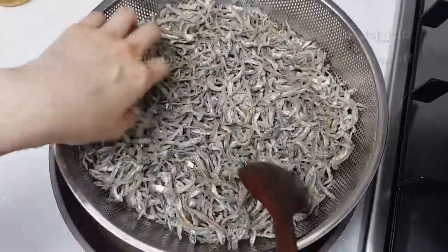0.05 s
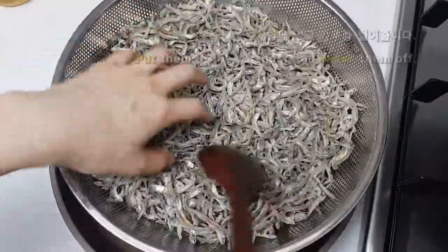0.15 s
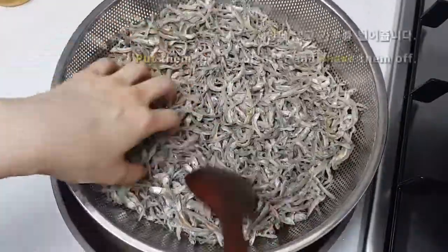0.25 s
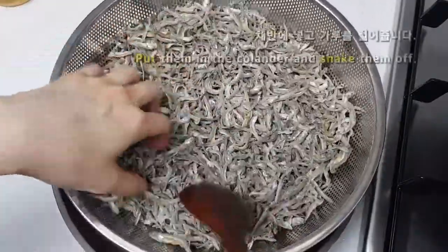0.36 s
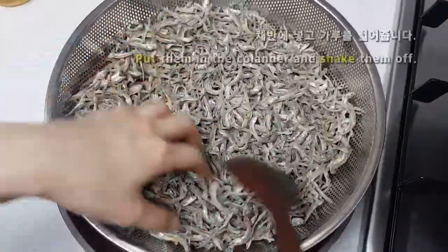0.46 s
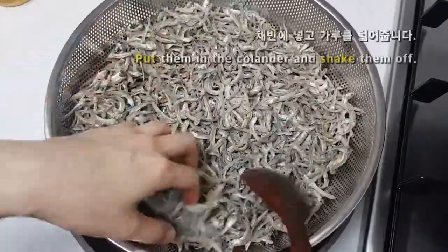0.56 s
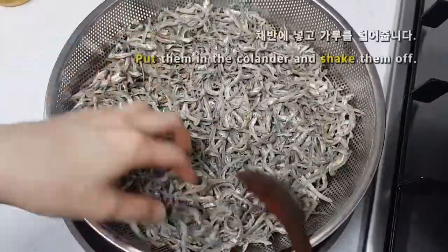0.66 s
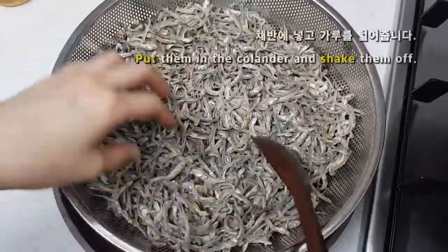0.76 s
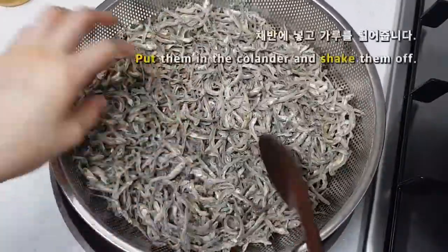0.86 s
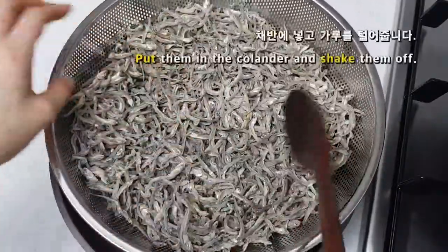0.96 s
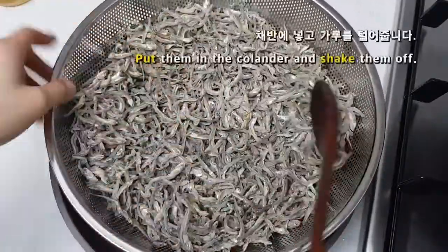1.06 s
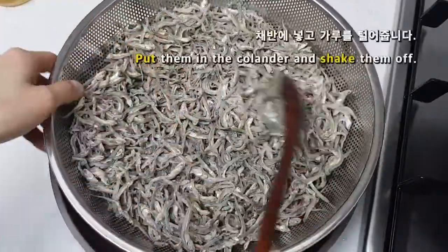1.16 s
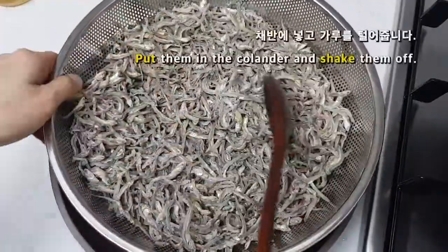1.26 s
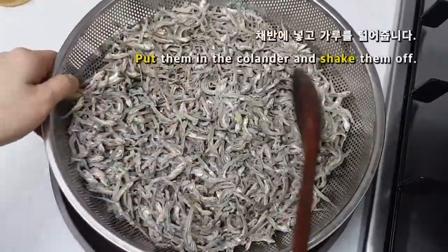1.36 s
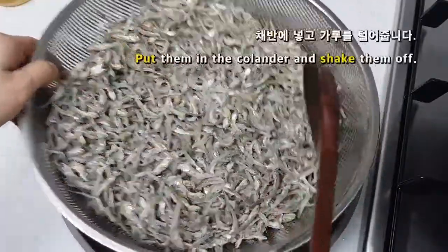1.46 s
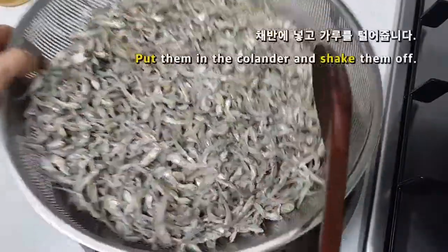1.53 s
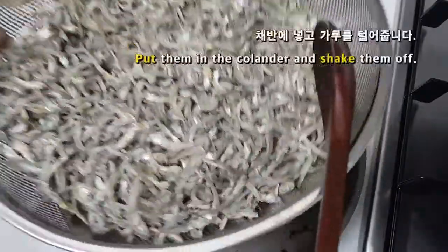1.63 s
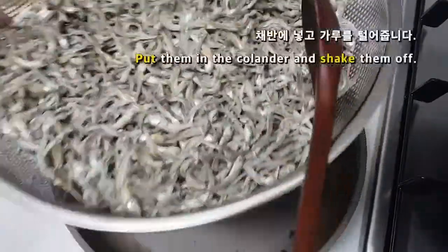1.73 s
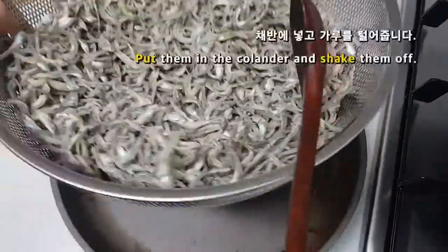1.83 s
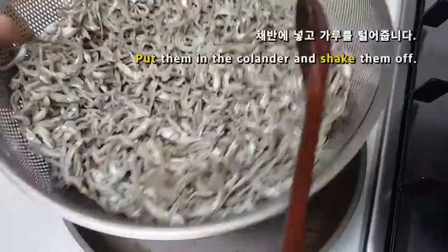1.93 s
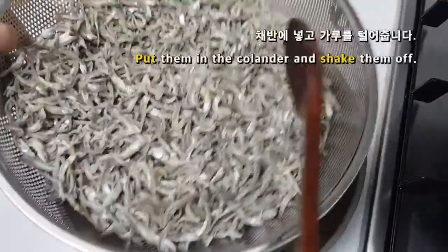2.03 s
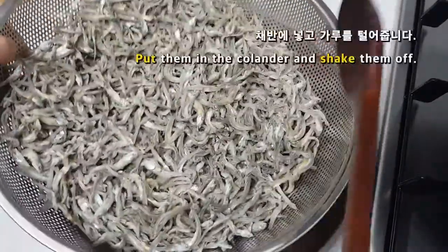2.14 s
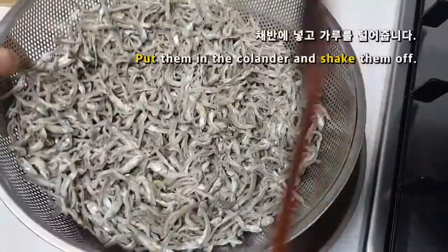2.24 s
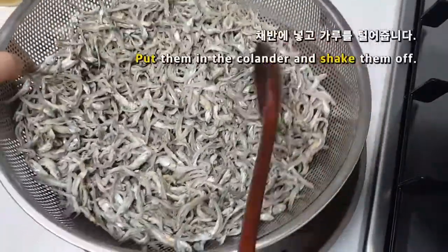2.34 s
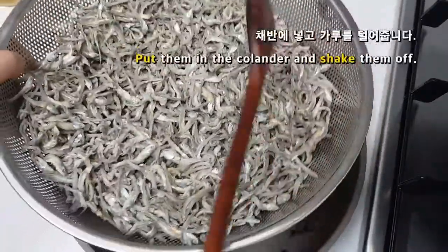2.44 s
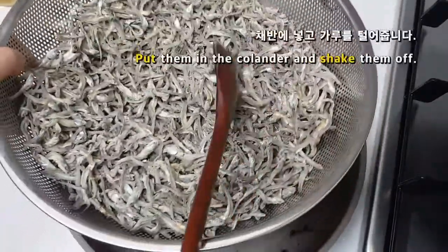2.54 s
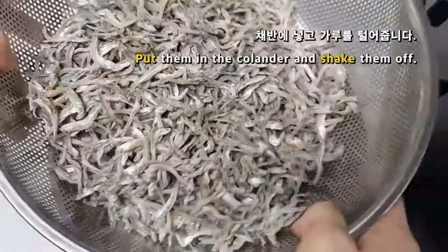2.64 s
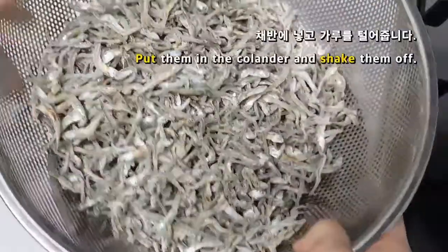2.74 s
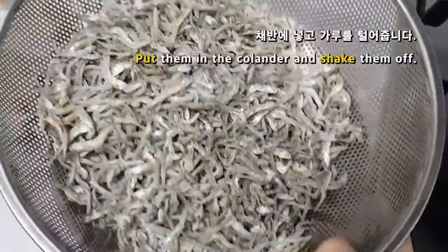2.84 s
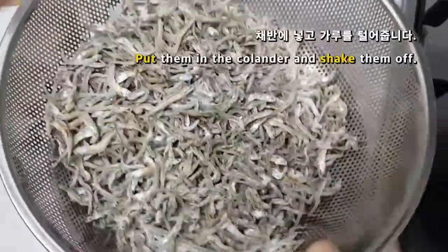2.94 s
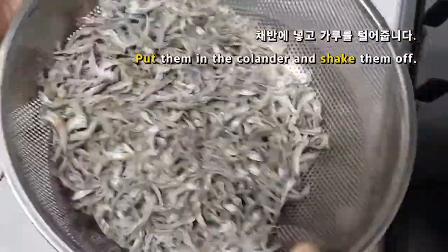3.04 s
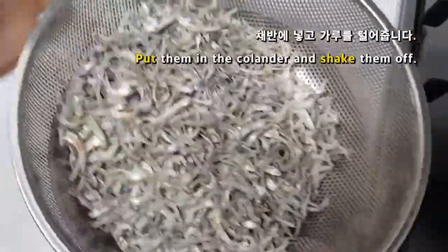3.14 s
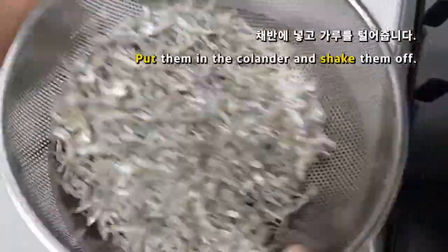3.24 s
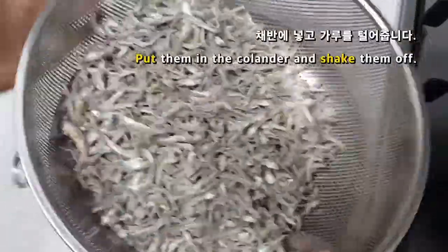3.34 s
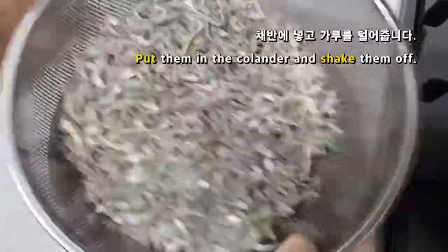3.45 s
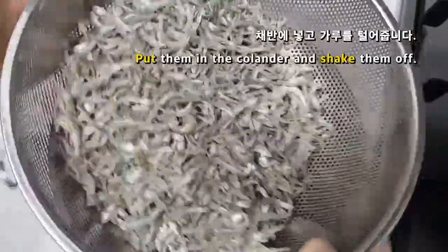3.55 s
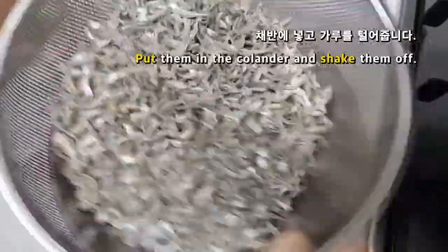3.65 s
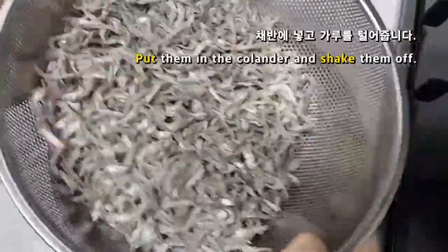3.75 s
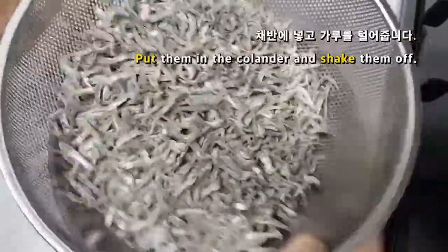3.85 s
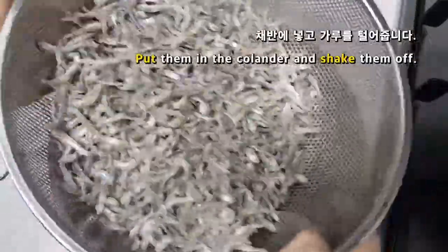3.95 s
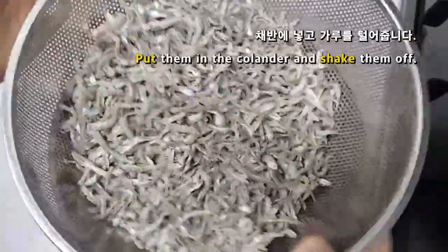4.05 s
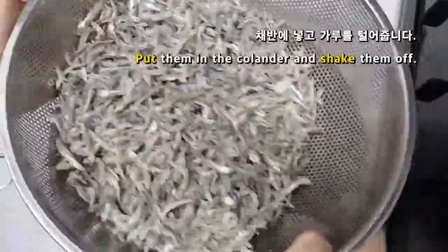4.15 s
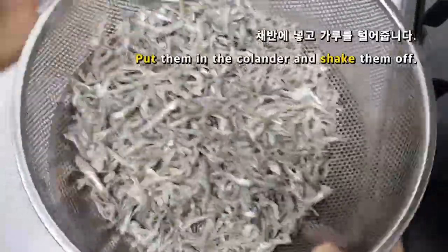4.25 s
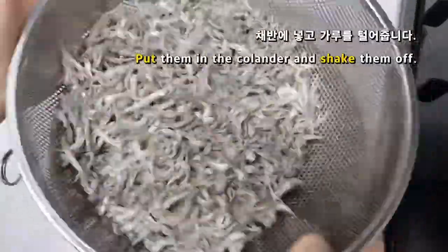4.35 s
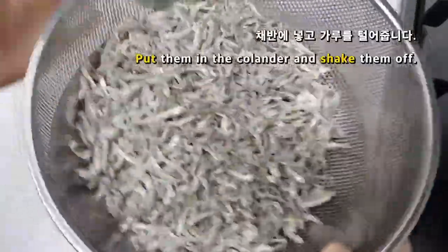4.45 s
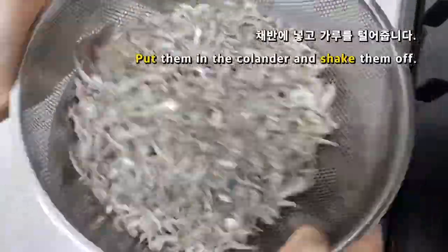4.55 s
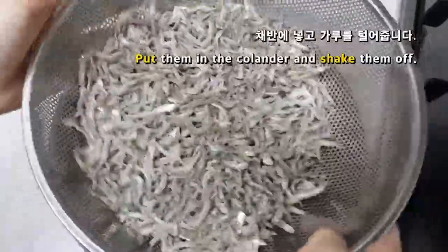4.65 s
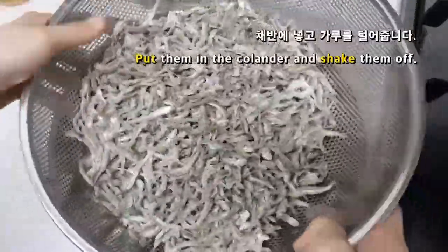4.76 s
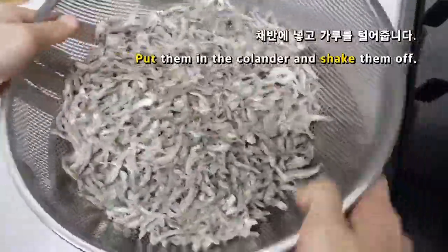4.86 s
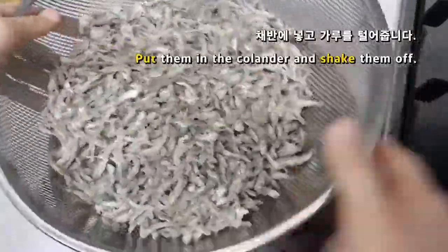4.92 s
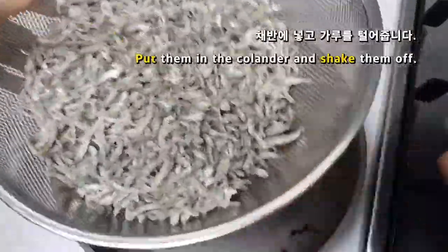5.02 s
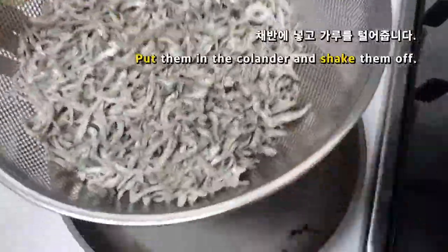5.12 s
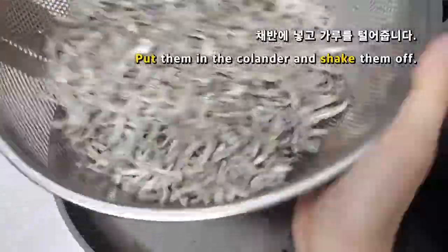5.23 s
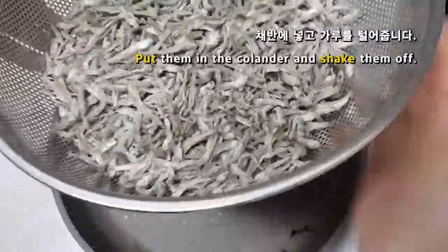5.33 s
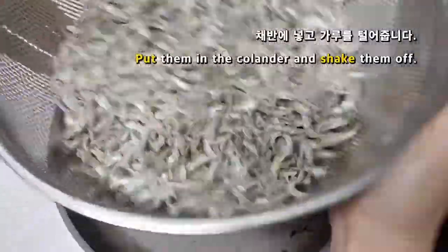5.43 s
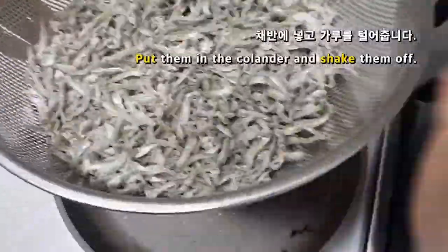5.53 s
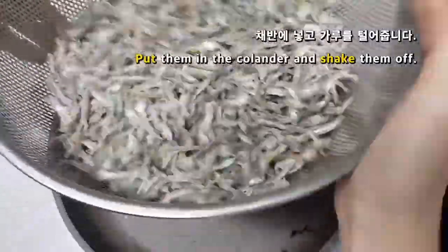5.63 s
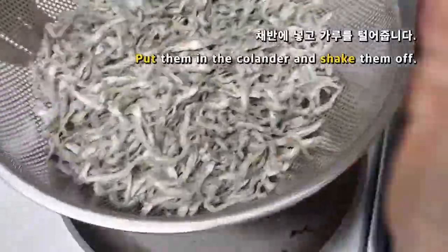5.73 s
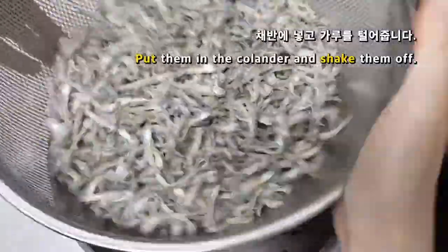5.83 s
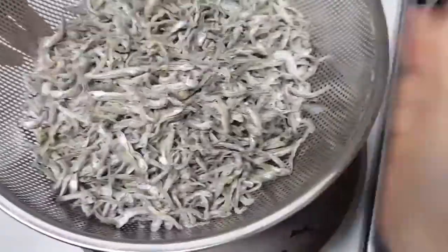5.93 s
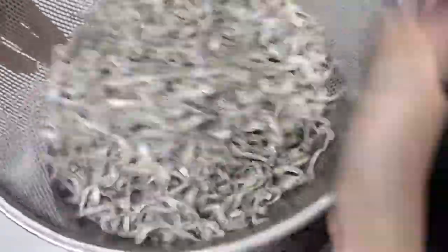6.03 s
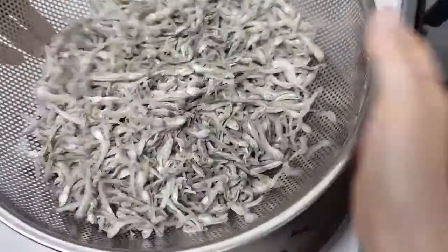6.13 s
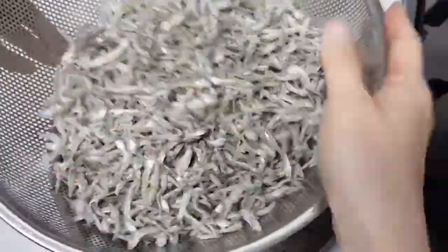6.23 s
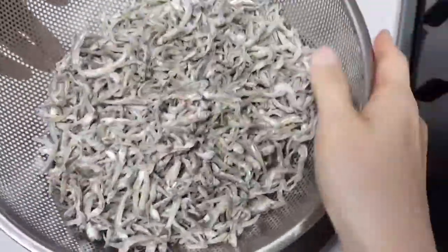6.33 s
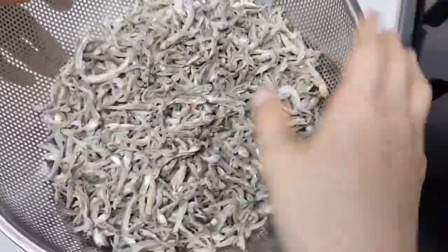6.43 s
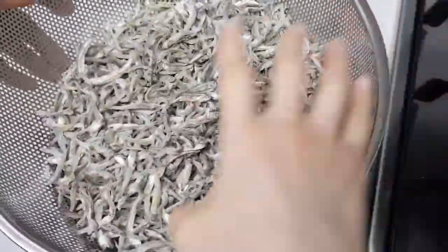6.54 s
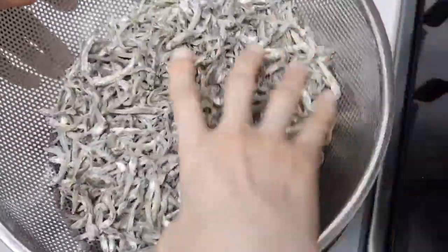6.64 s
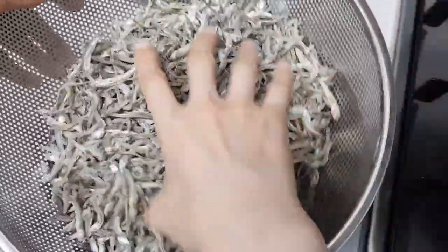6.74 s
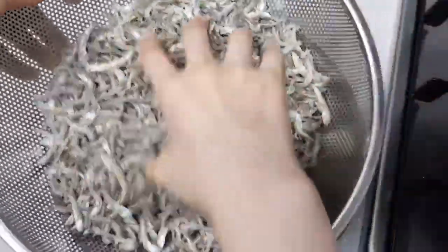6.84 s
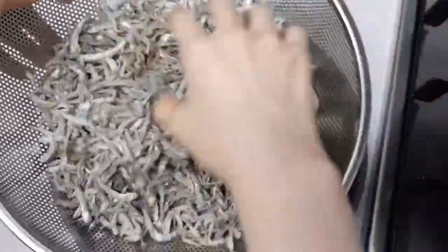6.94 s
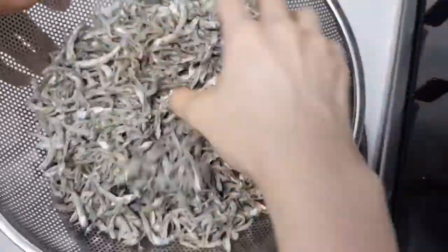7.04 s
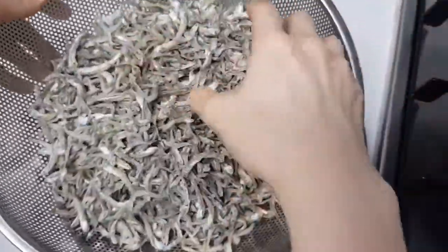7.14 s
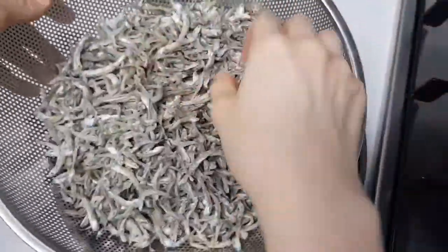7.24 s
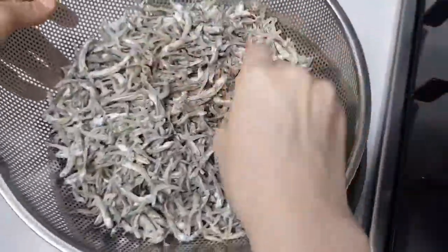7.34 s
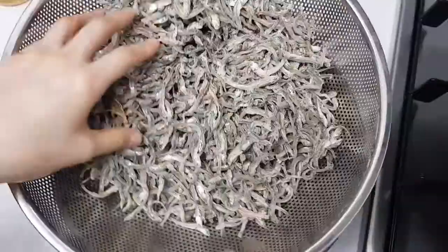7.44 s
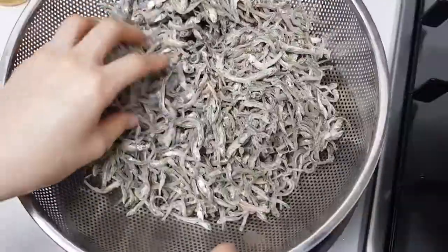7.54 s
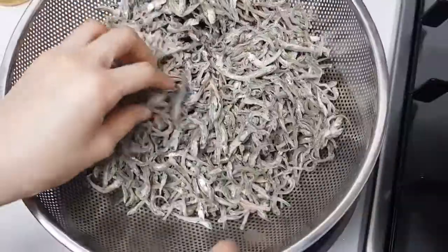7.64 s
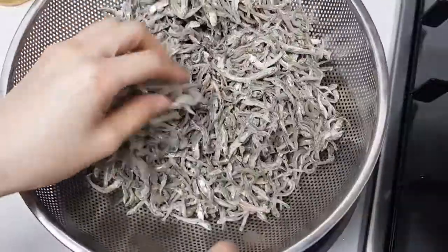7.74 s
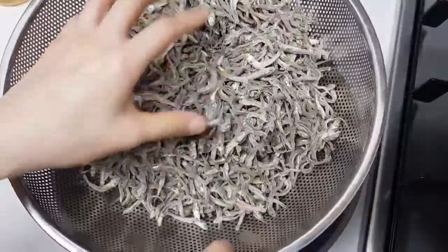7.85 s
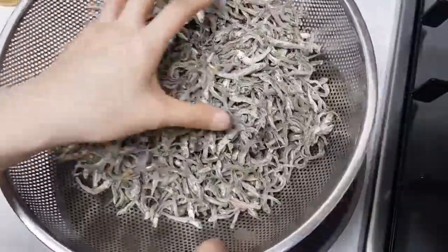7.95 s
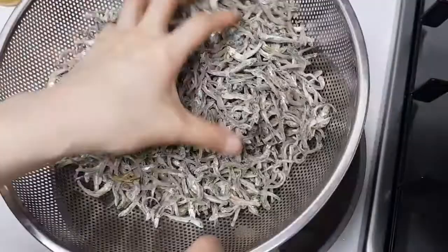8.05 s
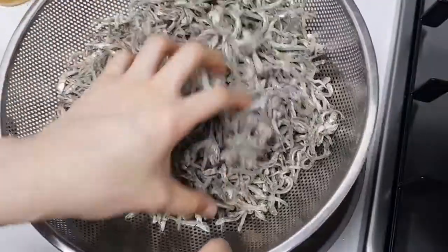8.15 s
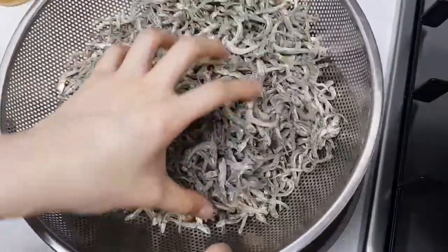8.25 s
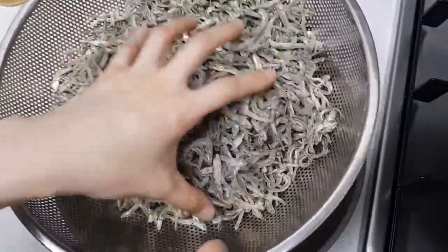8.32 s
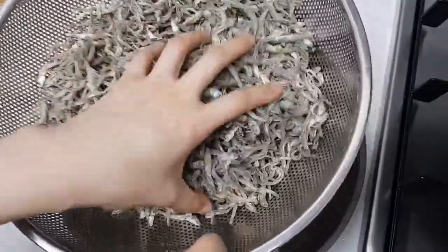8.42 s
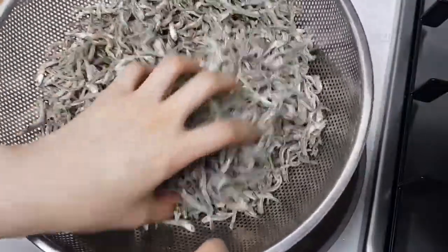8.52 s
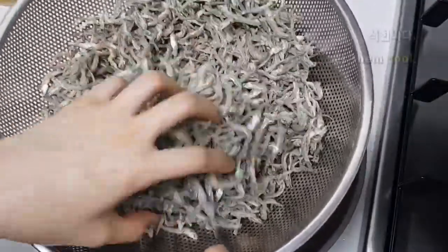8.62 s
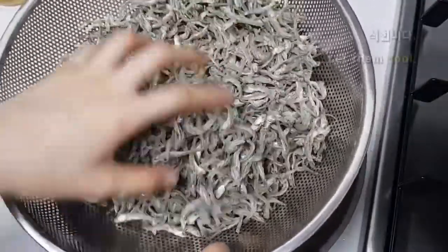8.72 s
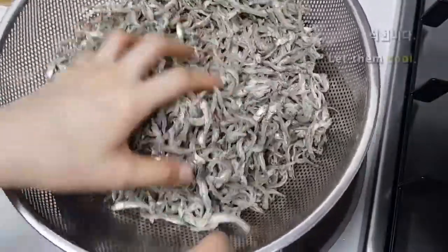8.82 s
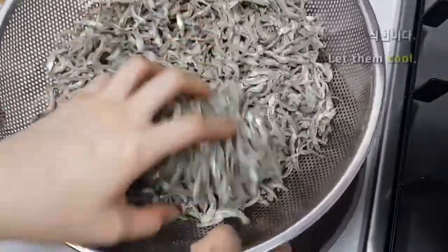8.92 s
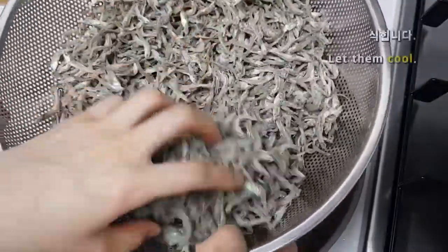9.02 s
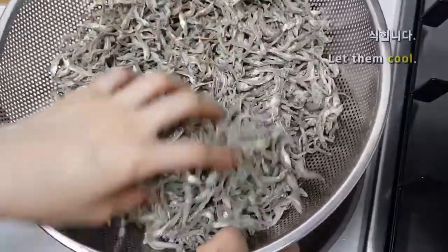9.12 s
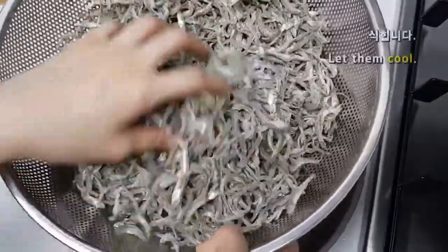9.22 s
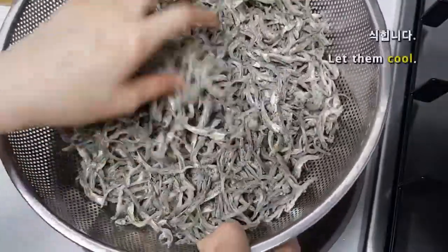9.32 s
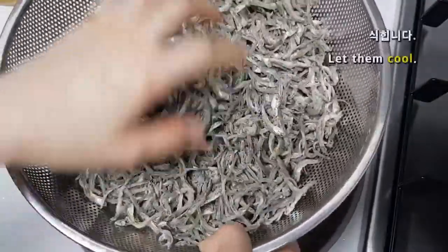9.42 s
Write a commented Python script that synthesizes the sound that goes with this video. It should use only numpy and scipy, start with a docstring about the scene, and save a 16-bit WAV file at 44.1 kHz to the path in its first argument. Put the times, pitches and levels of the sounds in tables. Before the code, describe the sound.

Close up in a small kitchen, brittle dried fish whisper and crackle as a hand stirs them in a metal sieve. One jolt and loose rattles lead to quick regular tosses, sharp and dry with low thuds. After a short gap, several slaps on the side shake the heap. It ends with quiet rustling and occasional snaps, above moving air, handling rumble and a thin steady whine, mostly toward the left.

```python
"""Small dried fish are stirred by hand in a steel mesh strainer, then tossed, patted from the side and stirred again.
Filtered random clicks make the fine hiss of rubbing and the swarm of tiny dry contacts after each jolt.
When the whole heap lands, noise bursts give knocks and deep thuds, and fading sine tones ring the bowl.
Fingers snap a fish, nudge the bowl or squeak on its rim.
The small kitchen adds scattered echoes, moving air, handling rumble and an appliance's hum and faint whine."""
import sys
import numpy as np
from scipy import signal
from scipy.fft import rfft, irfft
from scipy.io import wavfile

SR = 44100
rng = np.random.default_rng(int(sys.argv[2]) if len(sys.argv) > 2 else 0)


def output_pcm(signal):
    """Save a mono or channel-first signal as 16-bit PCM at the path in sys.argv[1].

    Samples are clipped to [-1, 1] before scaling.
    """
    pcm = np.clip(np.atleast_2d(signal).T, -1, 1) * 32767
    wavfile.write(sys.argv[1], SR, np.round(pcm).astype(np.int16))


N = 418068
TIME = np.arange(N) / SR  # seconds
SWARM_RISE_S = 0.002  # a swarm of contacts builds up this fast

# The heap hits the bowl. Each row: start in seconds, relative clatter level in dB, relative knock level in dB,
# knock pitch in Hz, swarm decay in seconds.
LANDINGS = [(1.6944, -30.5, -46.5, 720, 0.01), (3.0152, -30.5, -38, 1060, 0.025),
            (3.2551, -31, -41, 870, 0.024), (3.4625, -33.5, -38, 1370, 0.04),
            (3.6755, -25, -32, 1000, 0.016), (3.8913, -21, -32, 2000, 0.0089),
            (4.098, -21.5, -30.5, 680, 0.0083), (4.3253, -28, -35.5, 1470, 0.018),
            (4.5448, -25.5, -34.5, 770, .018), (5.2104, -29.5, -33, 740, 0.013),
            (5.416, -16, -32, 960, .009), (5.6322, -27, -35, 624, 0.01), (5.8333, -28, -45, 690, 0.014),
            (6.0462, -29.5, -39.5, 712, 0.035), (6.22, -41.5, -50.5, 705, 0.022)]
# Loose fish are flung against the mesh. Each row: start in seconds, relative clatter level in dB,
# swarm decay in seconds.
RATTLES = [(1.751, -40, 0.016), (1.7925, -42, 0.011), (1.8453, -43.5, 0.0045), (1.873, -48.5, .012),
           (1.949, -56, 0.056), (2.008, -39.5, 0.031), (2.216, -41.5, 0.0048), (2.311, -42.5, 0.012),
           (2.5264, -45, 0.0081), (2.7773, -55.5, 0.011), (2.921, -57.5, 0.013), (2.9642, -52, 0.0067),
           (3.176, -29.5, 0.016), (3.3174, -40, 0.0043), (3.4142, -30.5, 0.015), (3.4797, -32, 0.0043),
           (3.6158, -28.5, .012), (3.842, -23, 0.0048), (4.0639, -23.5, .011), (4.2774, -23, .011),
           (4.4816, -28, .012), (4.6979, -32.5, 0.011), (4.8796, -44, 0.0063), (5.218, -25, 0.0078),
           (5.235, -29, .006), (5.4423, -30.5, .005), (5.495, -35.5, 0.0062), (5.6375, -21, 0.0079),
           (5.685, -29, .013), (5.8392, -26, 0.0078), (5.8683, -34.5, 0.02), (6.054, -25, 0.0095),
           (6.075, -29.5, 0.014), (6.2383, -33.5, 0.015), (6.279, -30, 0.018), (6.4107, -51.5, 0.0062),
           (6.476, -41.5, 0.0081), (6.6127, -49, .01), (8.9996, -44.5, 0.0097), (9.0206, -44, 0.009)]
# How far the hold is two-handed tossing rather than patting the side. Each row: time in seconds, share from 0 to 1.
TOSSING = [(2.7, 0), (2.95, 1), (4.9, 1), (5.1, 0)]


def amp(db):
    """Turns decibels into a gain."""
    return 10 ** (np.asarray(db) / 20)


def evened(x):
    """Scales a sound to an rms strength of 1."""
    return x / np.sqrt(np.mean(x ** 2) + 1e-20)


def read(points, hz):
    """Reads a table between its rows, on a log-frequency axis."""
    f, value = np.transpose(points)
    return np.interp(np.log(hz + 1), np.log(f + 1), value)


def curve(rows):
    """Joins rows of (seconds, value) by straight lines over the whole scene."""
    return np.interp(TIME, *np.transpose(rows))


def add(mix, s, sound):
    """Mixes a sound in at time s."""
    part = mix[max(round(s * SR), 0):][:len(sound)]
    part += sound[:len(part)]


def drift(per_s):
    """A random curve of about unit size that heads for a new value per_s times a second."""
    knots = rng.standard_normal(3000)
    return np.interp(TIME * per_s, np.arange(len(knots)), knots)


def colour(x, spectrum, size=4096):
    """Filters with the given spectrum; the filter has energy 1 and never sounds ahead of its input."""
    hz = abs(np.fft.fftfreq(size, 1 / SR))
    log_gain = np.log(amp(np.maximum(read(spectrum, hz), -100)))
    # The Hilbert transform finds the phase that puts the energy as early as possible.
    taps = np.fft.ifft(np.exp(np.conj(signal.hilbert(log_gain)))).real[:size // 2]
    return signal.oaconvolve(np.atleast_2d(x), taps[None] / np.linalg.norm(taps), axes=1)[:, :N]


def blended(x, shares, first, second):
    """Moves between two colours as the hands change their hold."""
    share = curve(shares)
    return colour(x * share, first) + colour(x * (1 - share), second)


def resonate(x, hz, q):
    """One resonance of gain 1; a higher q makes it narrower."""
    return signal.lfilter(*signal.iirpeak(hz, q, fs=SR), x)


def ring(modes, uneven_db=2):
    """Dying sine tones; each blow shares its energy among them differently."""
    t = TIME[:SR // 2]
    total = np.zeros(len(t))
    for hz, db, t60 in modes:
        fade = np.exp(-np.log(1000) * t / t60)
        total += amp(db + uneven_db * rng.standard_normal()) * fade * np.sin(2 * np.pi * hz * t)
    return total


def contacts(per_s, spread_db):
    """Tiny contacts as random clicks of uneven size, with rms 1 overall."""
    size = amp(spread_db * np.minimum(rng.exponential(1, N), 4))
    struck = rng.random(N) < per_s / SR
    return evened(size * rng.choice([-1, 1], N) * struck)


def swarm(rows):
    """Strength of the contacts after each jolt: it swells quickly and dies as the fish settle."""
    power, t = np.zeros(N), TIME[:SR // 2]
    for s, db, rise, decay in rows:
        shape = (1 - np.exp(-(t / rise) ** 2)) * np.exp(-t / decay)
        add(power, s, (amp(db) * shape / shape.max()) ** 2)
    return np.sqrt(power)


def paths(lag_s, near_db, room_db, near_decay_s):
    """From one spot to the two microphones: direct sound, left first; scatter off bowl and hob; then the walls."""
    # How fast echoes die. Each row: frequency in Hz, time to fall by 60 dB in seconds.
    echo_times = [(100, 0.28), (500, 0.33), (2000, 0.27), (6000, 0.25), (15000, 0.21)]
    t = TIME[:SR // 3]
    scatter = rng.standard_normal((2, len(t))) * np.exp(-t / near_decay_s) * (t > .0001)
    # Sparse wall echoes begin after 6 ms and fade at a different speed in each band.
    echoes = rng.standard_normal((2, len(t))) * (rng.random((2, len(t))) < 4000 / SR) * (t > .006)
    hz, at, bands = signal.stft(echoes, SR, nperseg=256)
    fade = np.exp(-np.log(1000) * at / read(echo_times, hz)[:, None])
    tail = signal.istft(bands * fade, SR, nperseg=256)[1][:, :len(t)]
    out = amp(near_db) * scatter / np.linalg.norm(scatter, axis=1, keepdims=True)
    out += amp(room_db) * tail / np.linalg.norm(tail, axis=1, keepdims=True)
    out[0, 0] += 1
    out[1, round(lag_s * SR)] += 1
    return out


def kitchen(x, lag_s, near_db, room_db, near_decay_s, count=12):
    """Every few milliseconds the sound comes from a randomly chosen spot, with its own paths and colour."""
    spot = rng.integers(0, count, N // 128 + 1)[np.arange(N) // 128]
    heard = np.zeros((2, N))
    for k, lag in enumerate(lag_s * np.linspace(.8, 1.2, count)):
        from_spot = (x * (spot == k))[None]
        heard += signal.oaconvolve(from_spot, paths(lag, near_db, room_db, near_decay_s), axes=1)[:, :N]
    return heard


def noise_pair(spectrum, apart):
    """Coloured noise for two channels; a larger apart makes them less alike."""
    mid, side = evened(colour(rng.standard_normal((2, N)), spectrum))
    return np.array([mid + apart * side, mid - apart * side])


def leaning(x, table):
    """Makes the left channel louder than the right, band by band."""
    lean_db = read(table, np.fft.rfftfreq(N, 1 / SR))
    sides = amp(np.array([lean_db, -lean_db]) / 2)
    return irfft(rfft(x) * sides / sides.mean(0), N)


def raking(swell_share=0.84, release_s=0.061):
    """Strength of the strokes: each swells over a share of its length, holds while the hand moves, and dies away."""
    # Fingers or spoon rake through the heap. Each row: start in seconds, length in seconds, relative rustle level in dB.
    strokes = [(-.04, 0.038, -56), (0.228, 0.096, -56), (0.49, 0.15, -61.5), (1.045, 0.059, -59.5),
               (1.136, 0.051, -63), (1.37, 0.029, -68.5), (2.513, 0.1, -58), (6.56, 0.34, -55.5),
               (6.896, 0.11, -62), (7.386, 0.29, -61), (7.882, 0.25, -57.5), (8.33, 0.22, -58.5),
               (8.58, 0.12, -60), (8.72, 0.32, -55.5), (9.057, .18, -51.5)]
    power = np.zeros(N)
    for start, length, db in strokes:
        t = TIME - start
        swell = np.sin(np.pi / 2 * np.clip(t / (swell_share * length), 0, 1))
        release = np.exp(-np.maximum(t - length, 0) / release_s)
        power += (amp(db) * swell * release) ** 2
    return np.sqrt(power)


def rustle(stir_db=-2, snap_db=4, crackle_db=-9, snap_decay_s=0.00083, catch_db=1.5, catches_per_s=70):
    """Dry skins rub in a fine hiss with sparse crackles, catching and slipping; now and then one fish snaps."""
    # Single brittle fish snap under the fingers. Each row: start in seconds, relative level in dB.
    snap_rows = [(0.216, -55), (.3406, -48), (.834, -59), (1.178, -54), (6.796, -48.5), (7.0055, -56),
                 (7.3685, -58), (7.4335, -56), (7.635, -54), (7.71, -63), (7.808, -57.5), (8.346, -56.5),
                 (8.742, -57), (8.799, -51.5), (9.166, -48)]
    # How far the rustle is muffled under a flat palm. Each row: time in seconds, share from 0 to 1.
    palm_share = [(1.45, 1), (1.7, 0)]
    # Rustle under a flat palm, then in the open. Each row: frequency in Hz, relative level in dB per Hz.
    palm_colour = [(300, -4.5), (700, -11.5), (1400, -8), (2100, -9), (3100, -16.5), (4000, -0.5),
                   (5500, -1), (7000, 2.5), (8700, -3), (10500, 0.5), (12500, -1), (16000, 0.5)]
    open_colour = [(300, -20), (700, -9.5), (1400, -14), (2200, -12), (3100, -12.5), (4000, -2), (5500, -3),
                   (7000, -0.5), (8700, -4.5), (10500, 1.5), (12500, 1.5), (16000, 2.5)]
    # The heap slides to rest after each landing, and each snap shakes the fish around it.
    settling = swarm([(s, db - 32, 0.025, 0.098) for s, db, *_ in LANDINGS])
    shudder = swarm([(s, db - 5, SWARM_RISE_S, 0.023) for s, db in snap_rows])
    motion = np.sqrt((amp(stir_db) * raking()) ** 2 + settling ** 2 + shudder ** 2)
    motion *= amp(catch_db * drift(catches_per_s))
    hiss = contacts(per_s=10000, spread_db=1.5)
    crackles = amp(crackle_db) * contacts(per_s=93, spread_db=5.5)
    snaps = swarm([(s + 0.00074, db, .0002, snap_decay_s) for s, db in snap_rows]) * rng.choice([-1, 1], N)
    dry_sound = motion * (hiss + crackles) + amp(snap_db) * snaps
    heard = kitchen(dry_sound, lag_s=.00009, near_db=-2.5, room_db=-5, near_decay_s=0.0029)
    return blended(heard, palm_share, palm_colour, open_colour)


def background(air_db=-69, handling_db=-1, whine_hz=783.8, hum_db=-74, waver_hz=.7, lumpy_db=4.0):
    """Moving air and lumpy handling are shaped noise; an appliance's hum and wavering whine are sine tones."""
    # Moving air. Each row: frequency in Hz, relative level in dB per Hz.
    air_colour = [(15, -35), (25, 0), (92, -3), (166, -8.5), (560, -25.5), (714, -20), (775, -13),
                  (936, -28), (1480, -31.5), (3080, -32), (6560, -34), (8830, -41.5), (10400, -28.5),
                  (14400, -21.5), (16000, -26.5)]
    # Strength of the appliance's whine. Each row: time in seconds, level in dB.
    whine_levels = [(0, -78.5), (1.8, -77.5), (2.1, -74), (5, -75), (6.95, -72), (7.25, -76.5),
                    (8.4, -77.5), (8.87, -69), (9.48, -87.5)]
    # Dull rumble of handling. Each row: time in seconds, relative level in dB.
    handling_levels = [(0, -59.5), (.6, -67), (1.4, -63), (4.7, -61.5), (6.3, -63.5), (7.2, -67.5),
                       (8.2, -70.5), (8.85, -59.5), (9.48, -70)]
    whine_phase = 2 * np.pi * np.cumsum(whine_hz + waver_hz * drift(10)) / SR
    whine = amp(curve(whine_levels)) * np.sqrt(2) * np.sin(whine_phase)
    hum = amp(hum_db) * np.sin(2 * np.pi * 120 * TIME)
    # Each pair: frequency in Hz, relative level in dB per Hz.
    rumble = noise_pair([(20, -11), (35, -10.5), (70, 0.5), (120, -3), (160, -14), (300, -18),
                         (600, -29), (1200, -33.5), (3000, -55)], apart=0.24)
    handling = amp(handling_db + lumpy_db * drift(20)) * amp(curve(handling_levels)) * rumble
    air = amp(air_db) * noise_pair(air_colour, apart=0.79)
    return air + handling + whine + hum


def squeaks():
    """A hand rubs the rim: skin slips on it and feeds one resonance, so it sings briefly."""
    # Each row: start in seconds, relative level in dB, rise in seconds, decay in seconds, pitch in Hz, width in Hz.
    rubs = [(.10, -69.5, 0.015, 0.044, 720, 50), (1.17, -70, 0.0053, 0.047, 1840, 160),
            (6.235, -62.5, 0.0076, 0.035, 1520, 60), (6.28, -57, .004, 0.033, 1544, 60),
            (6.615, -75, 0.0054, 0.023, 1530, 80), (6.75, -68, 0.012, 0.08, 1150, 500)]
    total = np.zeros(N)
    for s, db, rise, decay, hz, width in rubs:
        tone = evened(resonate(rng.standard_normal(N), hz, hz / width))
        total += swarm([(s, db, rise, decay)]) * tone
    return kitchen(total, lag_s=.0001, near_db=-14, room_db=-11, near_decay_s=.003, count=1)


def bumps():
    """Fingers and spoon nudge the bowl: bursts of clicks are filtered into soft, dull scuffs."""
    # Each row: start in seconds, relative level in dB, rise in seconds, decay in seconds.
    nudges = [(.38, -62, 0.014, 0.024), (1.40, -66, 0.021, 0.039), (2.01, -64.5, 0.0087, 0.16),
              (2.55, -59, 0.0082, 0.036), (5.72, -61, 0.026, 0.11), (6.78, -63, .012, 0.049),
              (9.12, -80, 0.029, 0.11)]
    # Colour of a scuff. Each row: frequency in Hz, relative level in dB per Hz.
    scuff_colour = [(100, 9), (200, 6.5), (380, 5.5), (600, -3), (1300, -8.5), (2000, -11), (4000, -33)]
    scuffs = swarm(nudges) * contacts(per_s=2000, spread_db=2)
    heard = kitchen(scuffs, lag_s=.0001, near_db=-12, room_db=-11, near_decay_s=.004, count=2)
    return colour(heard, scuff_colour)


def strays(count=5, stray_db=-21, spread_s=0.04, uneven_db=3, decay_s=.006):
    """A few fish part from each rattle: early or late during tossing, only late otherwise."""
    rows = []
    for (s, db, _), draws in zip(RATTLES, rng.standard_normal((len(RATTLES), count, 2))):
        tossed = np.interp(s, *np.transpose(TOSSING)) > .5
        for when, size in draws:
            delay = spread_s * (when if tossed else abs(when))
            rows.append((s + delay, db + stray_db + uneven_db * size, decay_s))
    return rows


def clatter(gain_db=-1, mesh_db=-11, clumps_db=1.5, first_db=-1, first_decay_s=0.00084):
    """The first contact of each jolt cracks; then clumps of hard little bodies strike the mesh, which rings thinly."""
    # Contacts on the mesh while tossing, then patting. Each row: frequency in Hz, relative level in dB per Hz.
    toss_colour = [(700, -40), (1300, -12), (1900, -13.5), (2500, -4.5), (3200, -8.5), (4000, -0.5),
                   (5200, -4.5), (6800, -1), (8600, -4.5), (10500, 0), (12300, 4.5), (14500, -1.5),
                   (16000, 0)]
    pat_colour = [(700, -30), (1400, -12.5), (2200, -12.5), (3200, -8), (4000, 0), (5200, -6.5), (6800, 1),
                  (8600, -6), (10500, 1), (12300, 4), (14500, -4.5), (16000, 1.5)]
    # Thin ringing of the steel mesh. Each row: pitch in Hz, relative level in dB, time to fall by 60 dB in seconds.
    mesh_modes = [(3406, -9, .04), (4000, -2, .04), (5444, -5, .04), (6523, 1, .03), (7045, -1, .04),
                  (10762, -3, .03), (11825, 0, .035), (12585, 0, .03)]
    jolts = [(s, db, decay) for s, db, _, _, decay in LANDINGS] + list(RATTLES)
    first = swarm([(s + .001, db, .0002, first_decay_s) for s, db, _ in jolts]) * rng.standard_normal(N)
    strength = swarm([(s, db, SWARM_RISE_S, decay) for s, db, decay in jolts + strays()])
    clumps = amp(clumps_db * drift(200))
    hits = strength * clumps * contacts(per_s=4000, spread_db=1.5) + amp(first_db) * first
    heard = kitchen(hits, lag_s=.00025, near_db=-5, room_db=-6.5, near_decay_s=0.007)
    wires = ring(mesh_modes, uneven_db=1.5)
    rung = signal.oaconvolve(heard, wires[None] / np.linalg.norm(wires), axes=1)[:, :N]
    return amp(gain_db) * (blended(heard, TOSSING, toss_colour, pat_colour) + amp(mesh_db) * rung)


def bowl(knock_db=-2, ring_db=-7.0, damped_db=-8, pitch_db=4, q=4.4,
         rise_s=0.00034, decay_s=0.0094, impact_db=6, impact_decay_s=0.00055):
    """The heap knocks the slack mesh, whose pitch depends on where it lands; the bowl rings unless a palm damps it."""
    # Knock under the falling heap, then under a pat. Each row: frequency in Hz, relative level in dB per Hz.
    toss_colour = [(40, -12.5), (75, 12), (150, 1.5), (250, 4), (350, 1), (450, -1), (700, -3), (1000, -6),
                   (1500, -3.5), (2200, -3), (3300, -10), (6000, -21)]
    pat_colour = [(40, -18), (75, 6), (150, -3), (250, -3), (400, -5.5), (550, -5), (750, -2), (1100, -9),
                  (1500, -3), (2200, -8.5), (3500, -11), (6000, -24.5)]
    # Tones of the bowl. Each row: pitch in Hz, relative level in dB, time to fall by 60 dB in seconds.
    bowl_modes = [(254, -0.5, 0.25), (321, -8, 0.19), (546, -11.5, 0.17), (940, -24.5, 0.38),
                  (2300, -12, 0.2), (3000, -17.5, .1)]
    blows, rung, t = np.zeros(N), np.zeros(N), TIME[:SR // 8]
    for s, _, blow_db, hz, _ in LANDINGS:
        fall = np.exp(-t / decay_s) + amp(impact_db) * np.exp(-t / impact_decay_s)
        force = (1 - np.exp(-t / rise_s)) * fall
        blow = amp(blow_db) * force * rng.standard_normal(len(t))
        add(blows, s, blow + amp(pitch_db) * resonate(blow, hz, q))
        held = 1 - np.interp(s, *np.transpose(TOSSING))
        add(rung, s + .002, amp(blow_db + damped_db * held) * ring(bowl_modes))
    knock = kitchen(blows, lag_s=0.00022, near_db=-3, room_db=-4.5, near_decay_s=0.0043, count=4)
    return amp(knock_db) * blended(knock, TOSSING, toss_colour, pat_colour) + amp(ring_db) * rung


def thuds(weight_db=-47, follow=0.35, rise_s=0.0015, decay_s=0.022):
    """The hands catch the heap's weight with a soft, deep push, a little stronger after a hard knock."""
    # Weight of the heap in the hands. Each row: frequency in Hz, relative level in dB per Hz.
    push_colour = [(20, -15), (40, 1), (70, 0.5), (110, -5), (170, -21.5), (400, -28)]
    usual_db = np.mean([db for _, _, db, *_ in LANDINGS])
    pushes = [(s, weight_db + follow * (db - usual_db), rise_s, decay_s) for s, _, db, *_ in LANDINGS]
    return swarm(pushes) * noise_pair(push_colour, apart=0.29)


def scene():
    """The strainer lies to the left of the microphones and moves as it is shaken."""
    # The strainer is carried from side to side. Each row: time in seconds, extra left over right in dB.
    place = [(1.7, 0), (2.3, -.5), (3.1, -1.2), (4.0, -1.5), (4.7, -1.7), (5.2, 2.3), (5.8, 2.3),
             (6.3, -.8)]
    # Left over right, for the strainer and then the background. Each row: frequency in Hz, difference in dB.
    strainer_lean = [(60, 3.5), (125, 13), (250, 7), (500, 5), (1000, 9.5), (2200, 7), (4200, 10.5),
                     (6300, 15.5), (8300, 6), (12500, 1.5), (15500, 13)]
    background_lean = [(60, 10), (110, 3.8), (200, 9.8), (380, 4.1), (700, 20), (1290, 2.4), (2380, 1.0),
                       (4400, 3.3), (8120, 2.5), (15000, 1.5)]
    sway = amp(np.outer([1, -1], curve(place)) / 2)
    shaken = (clatter() + bowl() + thuds()) * sway
    strainer = shaken + rustle() + bumps() + squeaks()
    return leaning(strainer, strainer_lean) + leaning(background(), background_lean)


def record(dry, edge_hz=15800):
    """A steep low-pass filter removes the treble above its edge."""
    taps = signal.firwin(511, edge_hz, window=("kaiser", 9), fs=SR)
    return signal.oaconvolve(dry, taps[None], "same")


dry = scene()
out = record(dry)
output_pcm(out)
```